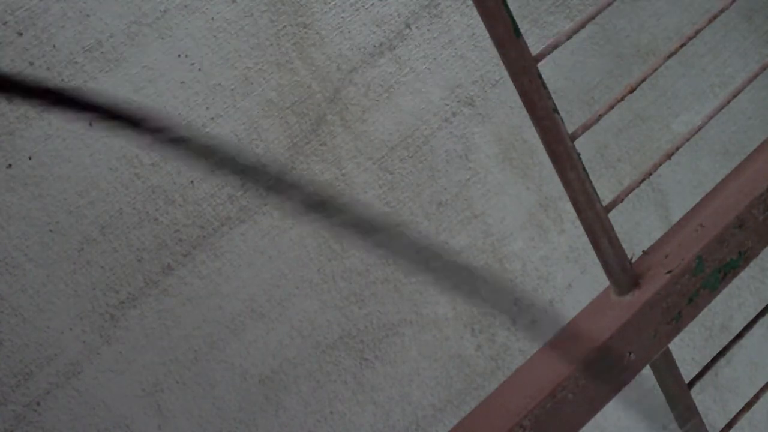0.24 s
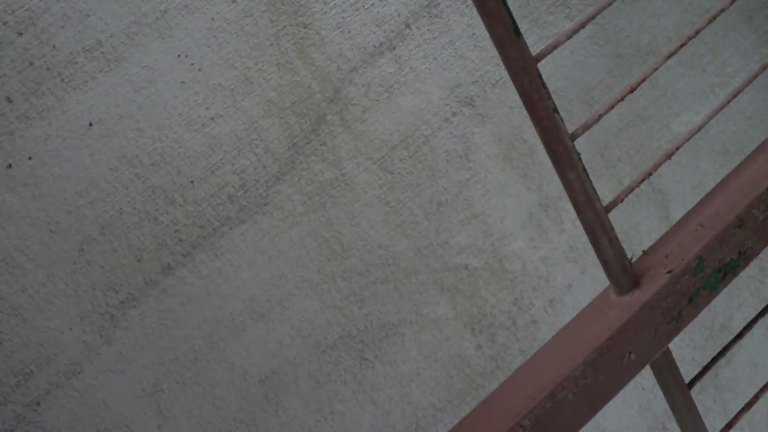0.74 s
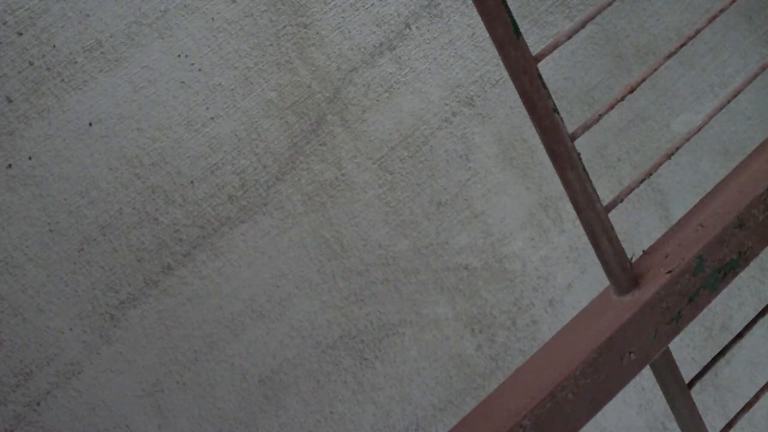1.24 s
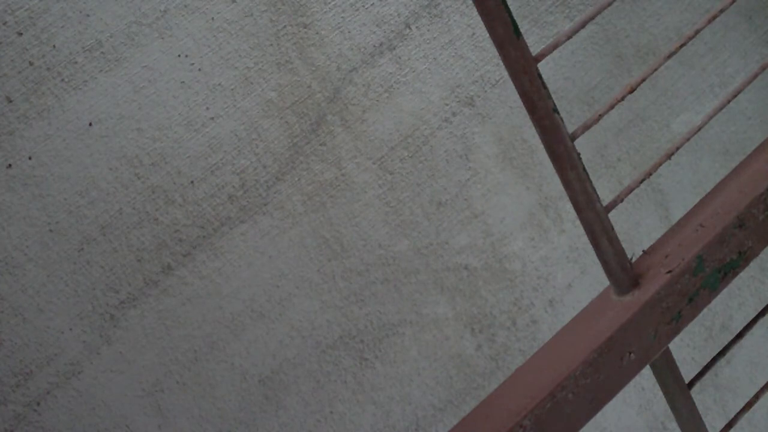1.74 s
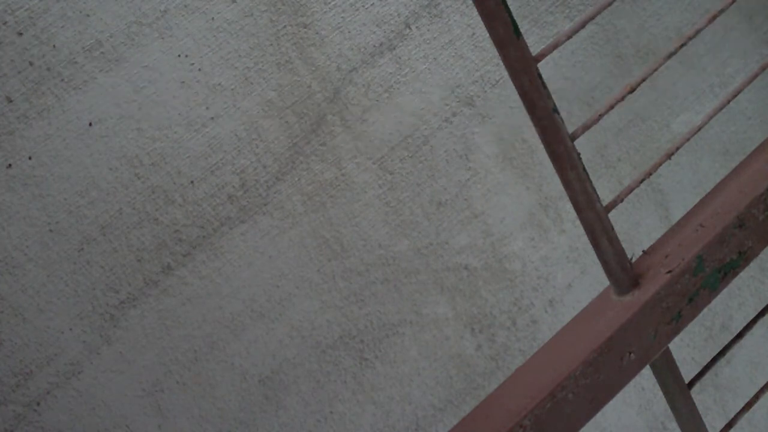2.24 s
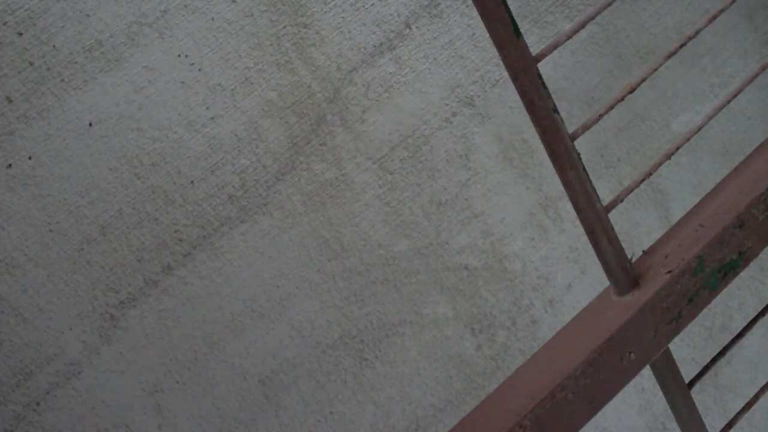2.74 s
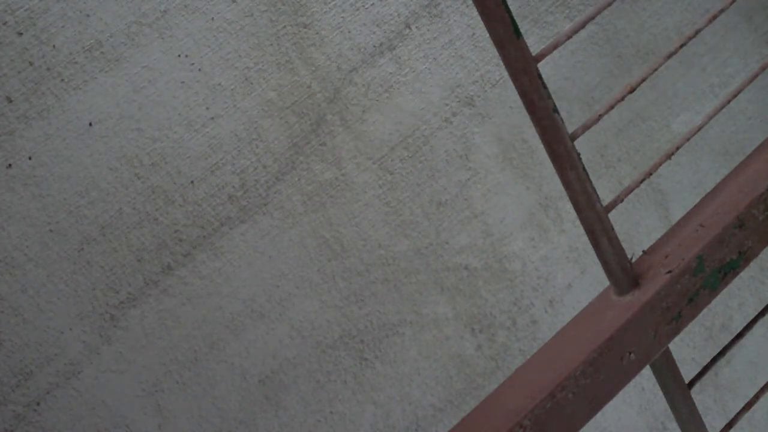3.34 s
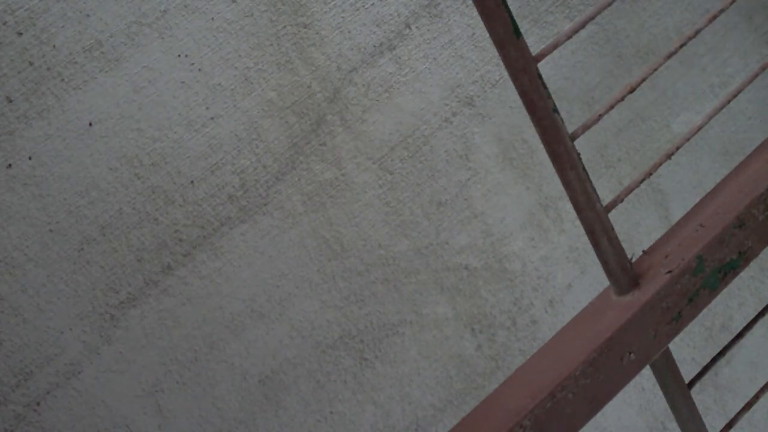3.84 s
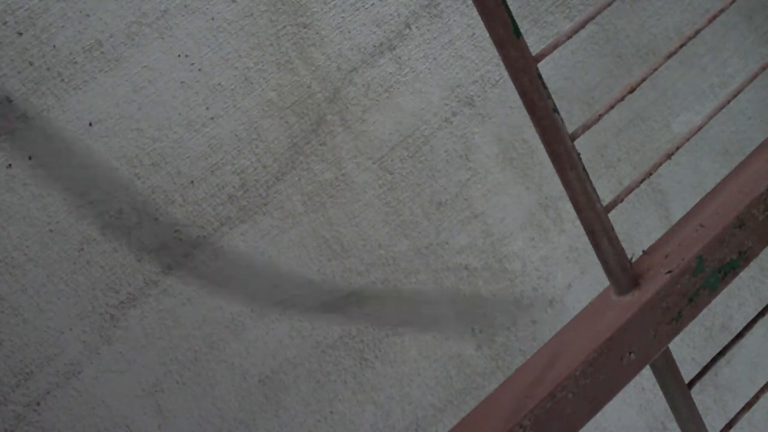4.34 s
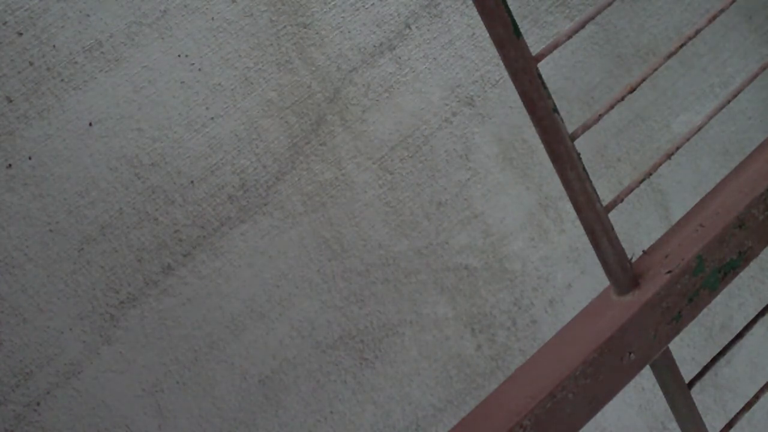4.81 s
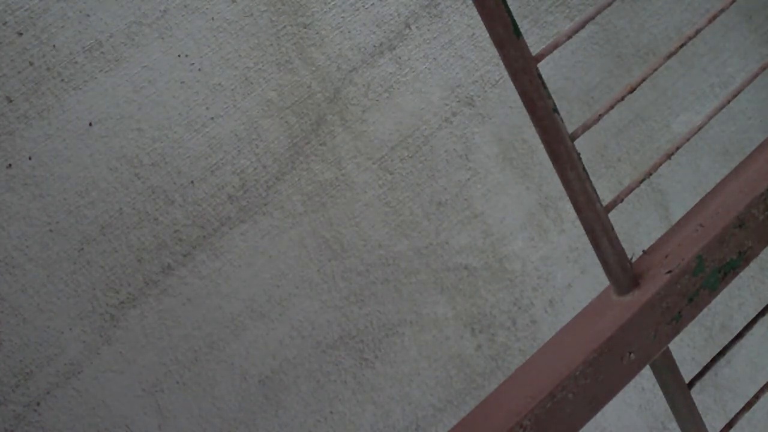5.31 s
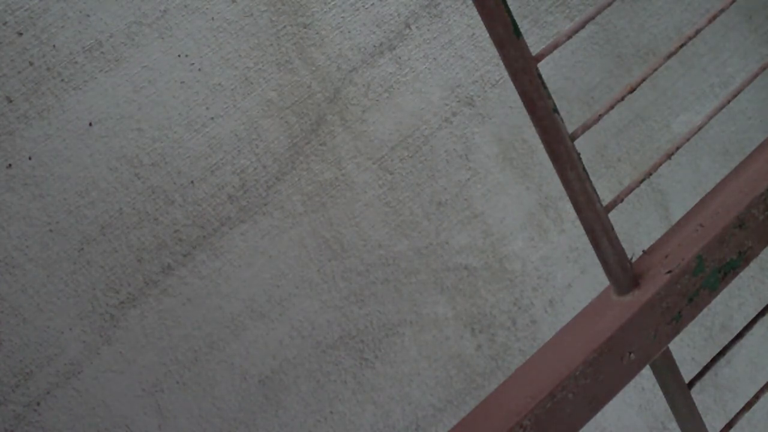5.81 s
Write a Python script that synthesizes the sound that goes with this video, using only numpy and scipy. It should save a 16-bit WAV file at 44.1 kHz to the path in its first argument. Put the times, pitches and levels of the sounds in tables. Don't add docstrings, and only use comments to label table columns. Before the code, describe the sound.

Close to a small microphone in a hard-walled outdoor yard, a leather whip cracks three times, about two seconds apart. Each crack is a tight, explosive cluster of snaps with a brief, rough wall echo. A faint air rush leads in, and light slaps and ticks of the lash follow. Low rumble, soft hiss and wind buffeting continue underneath.

```python
import sys
import numpy as np
from scipy import signal
from scipy.fft import rfft, irfft
from scipy.io import wavfile
from scipy.ndimage import uniform_filter1d

SR = 44100
rng = np.random.default_rng(int(sys.argv[2]) if len(sys.argv) > 2 else 0)


def unload_audio(sound):
    columns = np.transpose(np.atleast_2d(sound))
    steps = np.round(np.clip(columns, -1, 1) * 32767)
    wavfile.write(sys.argv[1], SR, steps.astype(np.int16))


def level_to_linear(level):
    exponent = np.asarray(level, float) / 20
    return 10 ** exponent


N = 267669

# frequency in Hz, density in dB per Hz.
SNAP_COLOUR = [(880, -42), (1500, -4.5), (3030, -3), (3480, -3.5), (6310, -3), (7750, -2.5), (8540, -3.5),
               (10900, -5), (15500, -25.5)]
# time in seconds, level in dB.
WIND_STRENGTH = [(0.0, -43.5), (0.41, -47.5), (0.6, -43), (0.88, -47), (1.22, -40.5), (1.35, -50.5),
                 (1.59, -43.5), (1.8, -49), (2.1, -44.5), (2.62, -47), (2.75, -43), (3.5, -46.5),
                 (4.09, -48), (4.43, -41), (4.62, -48.5), (4.9, -36), (5.1, -46.5), (6.07, -45.5)]


def evened(x):
    return x / np.sqrt(np.mean(x ** 2) + 1e-20)


def read(points, hz):
    f, value = np.transpose(points)
    return np.interp(np.log(hz + 1), np.log(f + 1), value)


def add(mix, s, sound):
    part = mix[max(round(s * SR), 0):][:len(sound)]
    part += sound[:len(part)]


def coloured(x, spectrum):
    hz = np.fft.rfftfreq(len(x), 1 / SR)
    return evened(irfft(rfft(x) * level_to_linear(read(spectrum, hz)), len(x)))


def wind_swell_db(t):
    s, db = np.transpose(WIND_STRENGTH)
    return np.interp(t, s, db - db.mean())


def outdoors():
    # frequency in Hz, density in dB per Hz.
    air_colour = [(7.1, -46), (12, 2.5), (56, -3), (296, -11), (324, -11), (423, -14.5), (491, -16.5),
                  (570, -17.5), (623, -19), (1560, -29), (2100, -32), (8010, -45.5), (9290, -45),
                  (11800, -51), (14500, -60)]
    air_db = -43
    frames, hz = N // 512 + 5, np.fft.rfftfreq(2048, 1 / SR)
    a, b, patches = rng.standard_normal((frames, 1025, 3)).T
    patches = uniform_filter1d(patches, size=20, axis=0)
    patches = evened(uniform_filter1d(patches, size=4, axis=1))
    swell_db = wind_swell_db(np.arange(frames) * 512 / SR)
    reach = 1 / (1 + (hz / 500) ** 1.46)
    level_db = read(air_colour, hz)[:, None] + 1.6 * patches + 0.56 * reach[:, None] * swell_db
    calm = level_to_linear(-3.0 * reach * np.minimum(hz / 60, 1))[:, None]
    z = (a + 1j * b) * level_to_linear(level_db) * calm
    return level_to_linear(air_db - 2.0) * evened(signal.istft(z, nperseg=2048, noverlap=1536)[1][:N])


def eddy(ms):
    u = np.arange(-300, 900) / SR * 1000 / np.clip(ms, .5, 9)
    rebound = 0.2 * np.exp(-((u - 1.3) / 2.1) ** 2)
    return rebound - np.exp(-(1.79 * u) ** 2)


def buffeting():
    # time in seconds, peak in dB, width in ms.
    sucks = [(0.966, -36, 1.9), (1.077, -32.5, 1.11), (1.207, -29.5, 1.1), (1.234, -32, 5.6),
             (1.802, -30, 2.3), (1.96, -30.5, 0.92), (2.018, -22, 3.7), (2.086, -27, 1.7),
             (3.156, -33, 2.4), (3.295, -30, 1), (3.769, -29.5, 1.24), (4.283, -28, 1.3),
             (4.933, -35, 0.71), (5.095, -27, 3.4), (5.232, -31.5, 2.4), (5.249, -32, 0.89),
             (5.603, -33, 7.2), (5.649, -30.5, 2.9), (5.776, -30.5, 1.9), (5.879, -29.5, 2.2)]
    # time in seconds, peak in dB, width in ms.
    pushes = [
        (1.209, -28, 2.3),
        (2.02, -29.5, 4.1),
        (2.884, -28, 1),
        (3.114, -29.5, 0.98),
        (4.147, -32.5, 7),
        (5.015, -32, 7),
        (6.017, -32.5, 1.8),
    ]
    eddies_per_s, eddy_db = 70, -42
    out = np.zeros(N)
    strength = level_to_linear(eddy_db + wind_swell_db(np.arange(N) / SR))
    for ms in (1.2, 1.7, 2.5, 3.8):
        when, size = rng.random(N), rng.exponential(1, N)
        sign = rng.choice([1., 1., 1., -1.], N)
        train = (when < eddies_per_s / 4 / SR) * sign * level_to_linear(2.86 * np.minimum(size, 4))
        out += signal.oaconvolve(train * strength, eddy(ms))[:N]
    for rows, sign in ((sucks, 1), (pushes, -1)):
        for s, db, ms in rows:
            add(out, s - 300 / SR, sign * level_to_linear(db) * eddy(ms))
    return out


def lash_air():
    # start in seconds, length in seconds, pitch in Hz,
    # level in dB.
    whistles = [(2.59, 0.061, 9051, -53), (2.6, .06, 9501, -70), (4.665, .055, 9101, -59),
                (4.69, .06, 9601, -69), (4.683, .025, 6901, -63), (2.885, 0.15, 14151, -67),
                (2.89, 0.23, 14200, -74), (3.07, 0.12, 9601, -70), (3.2, .065, 6901, -70),
                (1.245, 0.028, 9601, -72.5), (1.01, .035, 9601, -70.5)]
    # end in seconds, length in seconds, level at the end in dB.
    swishes = [
        (0.685, 0.16, -59),
        (2.68, 0.13, -56.5),
        (4.738, .08, -57),
    ]
    whistle_q, waver_share = 100, .45
    swish_swell_db = 19
    out = np.zeros(N)
    for s, length, hz, db in whistles:
        t = np.arange(0, length, 1 / SR)
        r = np.exp(-np.pi * hz / whistle_q / SR)
        a, b = rng.standard_normal((2, SR // 2))
        slow = signal.lfilter([1], [1, -r], a + 1j * b).real
        waver = evened(1 + waver_share * evened(slow)[:len(t)])
        tone = np.sin(2 * np.pi * hz * t) * signal.windows.tukey(len(t), .6)
        add(out, s, level_to_linear(db) * waver * tone)
    rush = coloured(rng.standard_normal(N), SNAP_COLOUR)
    for end, length, db in swishes:
        t = np.arange(-length, 0, 1 / SR)
        swell = level_to_linear(db + swish_swell_db * t / length) * signal.windows.tukey(len(t), .2)
        add(out, end - length, swell * rush[round(end * SR):][:len(t)])
    return out


def banded_decay(x, t60_scale):
    # frequency in Hz, time to fall by 60 dB in seconds.
    wall_t60 = [(200, 0.11), (500, 0.15), (1000, 0.25), (3000, 0.28), (8000, 0.29), (14000, 0.28)]
    far_db, far_longer = -12, 2.55
    hz, t, z = signal.stft(x, SR, nperseg=128)
    t60 = t60_scale * read(wall_t60, hz)[:, None]
    near = level_to_linear(-60 * t / t60)
    far_colour = np.minimum(hz / 600, 1) / (1 + (hz / 9000) ** 2)
    far = level_to_linear(far_db - 60 * t / (far_longer * t60)) * far_colour[:, None]
    uneven = uniform_filter1d(rng.standard_normal((65, 420)), size=9, axis=0)
    uneven = uniform_filter1d(uneven, size=5, axis=1)
    uneven = level_to_linear(1.5 * evened(uneven))[:, :len(t)]
    return signal.istft(z * uneven * np.hypot(near, far), SR, nperseg=128)[1][:len(x)]


def answer(snap_db, body_db, rise_ms, held_ms, dying):
    # frequency in Hz, density in dB per Hz.
    body_colour = [(88, -50), (150, -13.5), (415, -1), (584, -1), (1310, -3), (1430, -8), (1730, -4),
                   (2250, -12), (4000, -13), (5200, -29), (8800, -120)]
    t = np.arange(SR // 2 + 4000) / SR
    spikes = level_to_linear(1.76 * np.minimum(rng.exponential(1, (2, len(t))), 5))
    echoes = rng.standard_normal((2, len(t))) * spikes
    mixed = coloured(echoes[0], SNAP_COLOUR) + level_to_linear(body_db) * coloured(echoes[1], body_colour)
    held = round(np.clip(held_ms, 0, 60) / 1000 * SR)
    tail = banded_decay(mixed[held:], np.clip(dying, .1, 3))
    sound = np.concatenate([mixed[:held], tail])
    swell = (1 - np.exp(-1000 * t / np.clip(rise_ms, .2, 30))) ** 2
    return level_to_linear(snap_db) * sound * swell


def shock(ms):
    u = np.arange(600) / SR * 1000 / np.clip(ms, .05, 5)
    front = 1 - np.exp(-np.arange(600) / (1 + 2.0 * ms))
    return front * np.cos(2 * np.pi * u) * np.exp(-u / 0.69)


def whip():
    # time in seconds, peak in dB, pulse length in ms, low push in dB, push length in ms.
    cracks = [
        (.6760, -9, 0.73, -19.5, 3.7),
        (2.7023, -10.5, 0.89, -20.5, 3),
        (4.7600, -6, 1, -21, 4.7),
    ]
    # delay in ms, level in dB, factor on the pulse length.
    arrivals = [
        (0, 2, 1.22),
        (1.6, 2, 0.64),
        (2.5, 0, 0.36),
        (3.6, -8.5, 0.61),
        (7.5, -8, 0.7),
        (10, -4.5, 0.79),
        (11.8, -11.5, .75),
        (13.2, -8, 1.06),
    ]
    # time in seconds, peak in dB, pulse length in ms.
    ticks = [(0.672, -19, 1), (1.281, -29.5, 0.26), (1.2852, -27, 0.37), (2.823, -27, 0.61),
             (2.827, -26, 0.53), (2.879, -28, 1.6), (2.884, -35, .8), (2.8945, -34, .14),
             (3.785, -20, 0.14), (3.789, -23, 0.13), (4.983, -44, 0.1)]
    # start in seconds, snap in dB, body in dB relative to the snap, hold in ms.
    answers = [(.57, -71, -5, 12.), (0.6732, -21.5, -3.5, 19.2), (1.011, -61, -12, 8.),
               (1.188, -67, -8, 8.), (1.279, -60.5, 2, 7.9), (1.804, -62, -15, 9.7), (2.683, -51.5, 4, 6),
               (2.699, -23.5, -9.5, 5), (2.815, -48.5, 4, 20), (2.882, -43, -5.5, 12),
               (3.721, -65, -14, 9.7), (3.787, -51.5, -0.5, 3), (3.835, -57, -2.5, 8.7),
               (4.153, -74, -10.5, 6.2), (4.735, -56, 2.5, 7.5), (4.759, -24, 4.5, 5.4),
               (4.976, -48.5, -7.5, 6.2), (5.389, -59, 5.5, 13), (5.548, -62, -8.5, 8.8)]
    push_later_ms = 1.6
    crack_from_db = -35
    crack_rise_ms, slap_rise_share = 0.5, 0.14
    full_body_db, shorter_per_db = -6.5, 0.22
    out = np.zeros(N)
    for s, db, ms, push_db, push_ms in cracks:
        add(out, s + push_later_ms / 1000, level_to_linear(push_db) * shock(push_ms))
        for delay_ms, gain_db, stretch in arrivals:
            add(out, s + delay_ms / 1000, level_to_linear(db + gain_db) * shock(ms * stretch))
    for s, db, ms in ticks:
        add(out, s, level_to_linear(db) * shock(ms))
    for s, snap_db, body_db, held_ms in answers:
        if snap_db > crack_from_db:
            rise_ms, dying = crack_rise_ms, 1
        else:
            rise_ms = slap_rise_share * held_ms
            dying = 1 - shorter_per_db * max(full_body_db - body_db, 0)
        add(out, s, answer(snap_db, body_db, rise_ms, held_ms, dying))
    return out


def scene():
    return (outdoors() + buffeting() + lash_air() + whip())[None]


def roll_off(x):
    return signal.sosfilt(signal.butter(12, 15970, fs=SR, output="sos"), x)


def record(dry):
    notch_hz, notch_width_hz, edge_hz = 7880, 190, 15250
    hz = np.fft.rfftfreq(N, 1 / SR)
    squeezed = .8 * np.tanh(dry / .8)
    notch = signal.iirnotch(notch_hz, notch_hz / notch_width_hz, SR)
    notched = signal.lfilter(*notch, signal.lfilter(*notch, squeezed))
    edge = np.minimum(hz / 8, 1) / (1 + (hz / edge_hz) ** 60)
    return roll_off(irfft(rfft(notched) * edge, N))


dry = scene()
out = record(dry)
unload_audio(out)
```